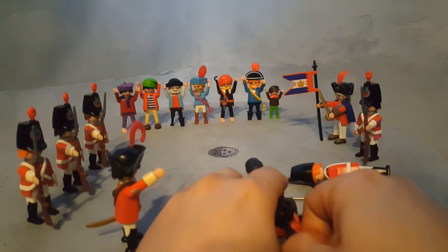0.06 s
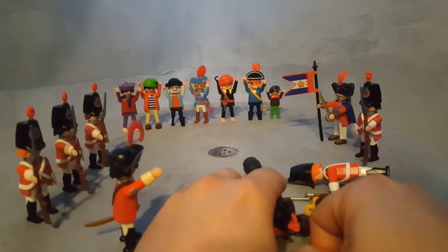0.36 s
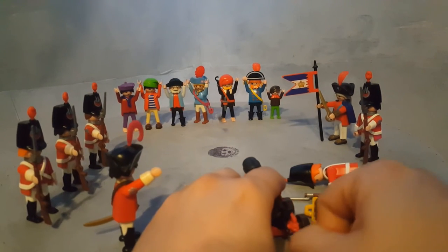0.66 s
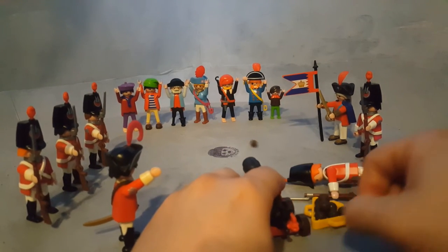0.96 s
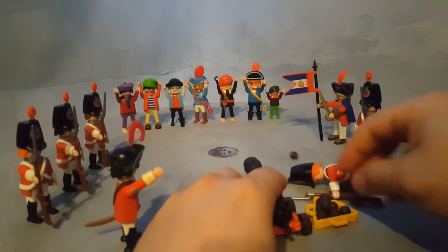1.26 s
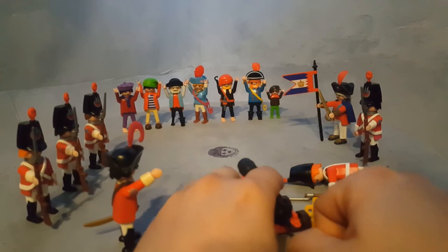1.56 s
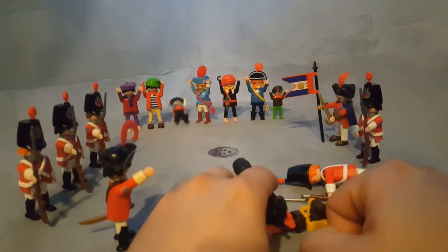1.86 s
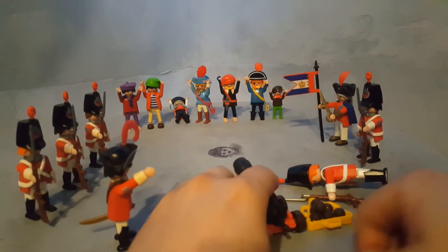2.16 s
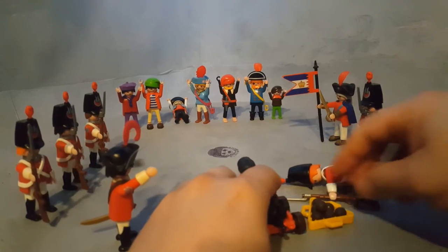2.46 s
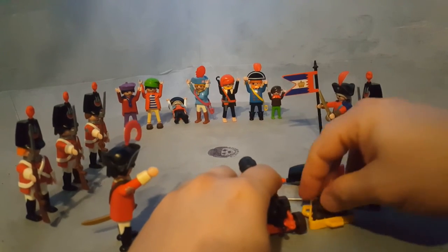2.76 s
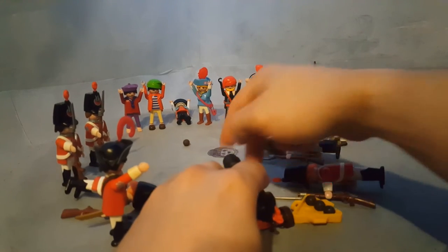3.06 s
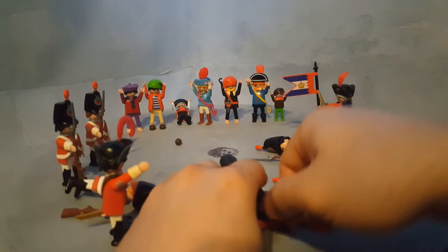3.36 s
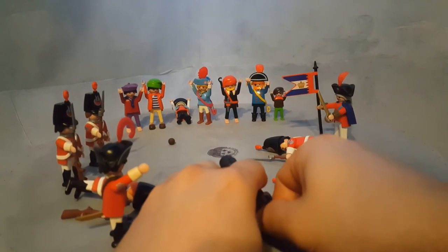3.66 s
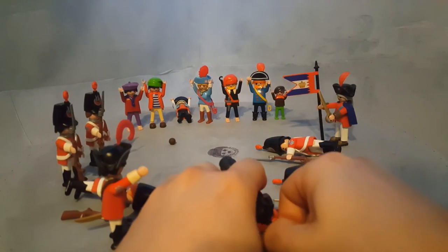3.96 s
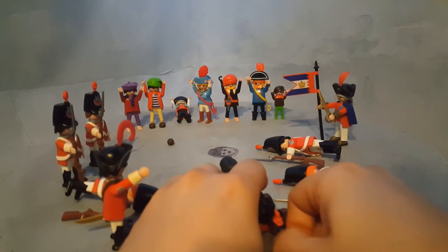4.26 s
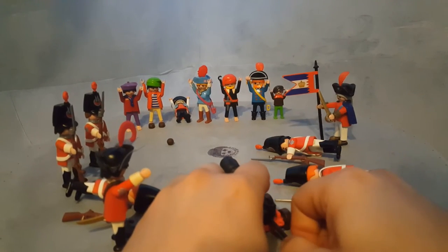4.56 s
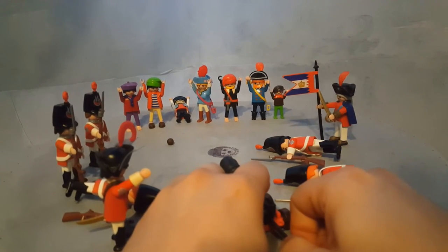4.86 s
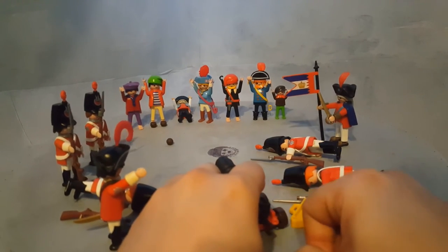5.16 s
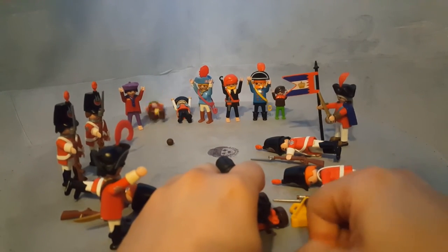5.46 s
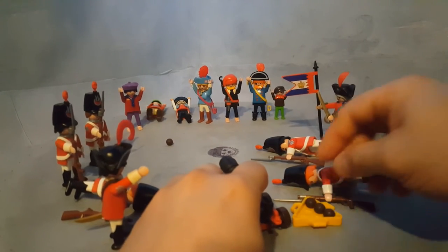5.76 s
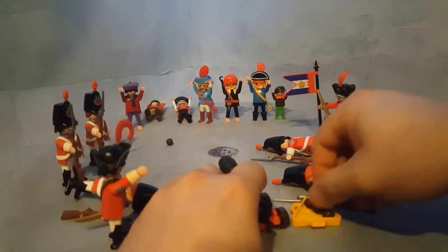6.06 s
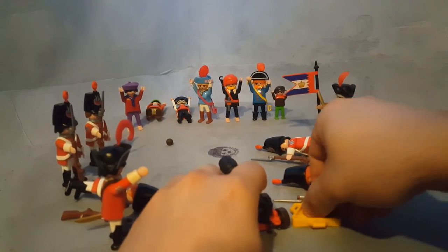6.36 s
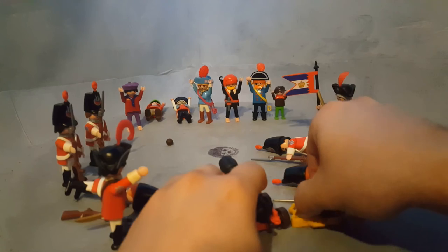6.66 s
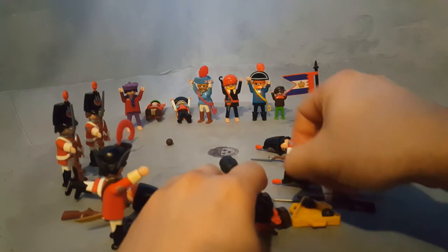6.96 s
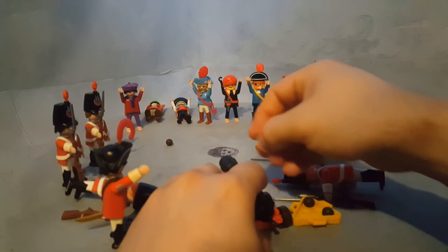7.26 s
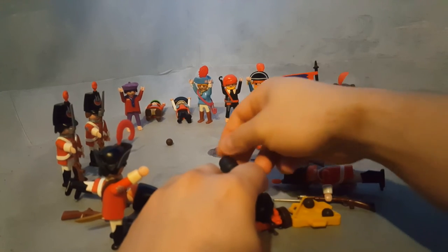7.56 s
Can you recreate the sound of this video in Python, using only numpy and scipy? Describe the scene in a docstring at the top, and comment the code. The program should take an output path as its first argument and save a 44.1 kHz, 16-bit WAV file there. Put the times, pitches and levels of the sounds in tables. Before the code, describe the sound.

A toy spring cannon snaps three times; a small ball bounces and rolls on a wooden table, and plastic soldiers topple.

```python
"""A toy spring cannon fires three times across a wooden table in a small room. The spring snaps and
kicks the table; a little ball knocks, bounces and rolls; plastic soldiers topple. Blows on the table
are short pulses that ring its modes; plastic cracks are fast-decaying noise. Fingers nudge, click and
drag the pieces, and a loose part pings. A fine hiss swells after each shot and fades, with some finger
rubbing. Quiet room noise lies below. Six times the level dips briefly."""
import sys
import numpy as np
from scipy import signal
from scipy.fft import rfft, irfft
from scipy.io import wavfile
from scipy.ndimage import uniform_filter1d

SR = 44100
rng = np.random.default_rng(int(sys.argv[2]) if len(sys.argv) > 2 else 0)


def transcribe(signal):
    """Save signal, clipped to [-1, 1], as a 16-bit WAV file at the path in sys.argv[1]."""
    frames = np.atleast_2d(signal).T
    limited = np.clip(frames, -1, 1)
    pcm = np.round(limited * 32767).astype(np.int16)
    wavfile.write(sys.argv[1], SR, pcm)


N = 339570
IMPULSE_N = 12288
TIME_S, AGE_S = np.arange(N) / SR, np.arange(IMPULSE_N) / SR
BIN_HZ = np.maximum(np.arange(IMPULSE_N // 2 + 1) * SR / IMPULSE_N, 1)

# spectra: freq_hz, gain_db
AIR_COLOUR = [(12, -37), (28, -18.5), (60, -10.5), (120, -4.5), (200, -12.5), (330, -18.5), (560, -24),
              (1000, -32), (1600, -31), (2500, -34), (4000, -39.5), (8000, -50), (16000, -51)]
HISS_COLOUR = [(100, 3.5), (400, 6), (800, 16.5), (1500, 9.5), (2500, 2.5), (4500, 1), (6500, -3),
               (8600, 1), (10500, -4.5), (16000, 0.5)]
KNOCK_COLOUR = [(50, -28.5), (110, -18.5), (200, -21.5), (300, -13.5), (400, -8.5), (500, -7), (700, -1),
                (1200, -3), (1550, -5), (1900, -15.5), (2400, -23), (4000, -34), (8000, -44), (16000, -54)]
CLICK_COLOUR = [(200, -16.5), (600, -5), (1400, -3), (2600, -7), (3400, -3.5), (4000, -4.5), (4600, -3.5),
                (5600, -3.5), (7000, -2.5), (8700, 0.5), (10200, -7.5), (13000, -5.5), (16000, -13)]
ROLL_COLOUR = [(100, -22), (400, -21), (650, -5), (850, 1), (1150, 1.5), (1400, -5), (1750, -28),
               (2500, -21.5), (5000, -44.5), (16000, -53.5)]
NUDGE_COLOUR = [(100, -16), (300, -12.5), (450, -5.5), (850, 1.5), (1400, -6.5), (2200, -14), (3500, -22),
                (8000, -32), (16000, -40.5)]
DRAG_COLOUR = [(60, -14), (150, -6), (320, 2), (700, -1.5), (1400, -2.5), (2100, -11.5), (3200, -23.5),
               (6000, -32), (16000, -56)]
# modes of the table top and of a small loose part: freq_hz, level_db, t60_s
TABLE_MODES = [(334, -9, 0.31), (404.2, -1.5, 0.067), (457.2, -2.5, 0.21), (525.6, -1, 0.19),
               (612, -3.5, .12), (681.7, -6, .14), (735, -0.5, 0.095), (840.3, -7.5, 0.18),
               (916.4, -7.5, 0.16), (1035, -1.5, 0.11), (1120, -5, .12), (1182, -3, 0.058),
               (1361, 3.5, 0.058), (1373, -2, 0.077), (1430, -1.5, 0.15), (1488, -6, 0.11), (1710, -7, .13),
               (1840, -1.5, 0.086)]
PING_MODES = [(2040, -4, .1), (2466, -9, .1), (3375, -7, .07), (3887, -2, .08), (5523, 0, .1),
              (5750, -3, .06), (6955, -10, .06)]
# room decay: freq_hz, t60_s
ROOM_DECAY = [(150, 0.65), (600, 0.095), (1400, .22), (3700, 0.14), (9000, 0.12), (16000, 0.093)]
# wavering room tones: centre_hz, width_hz, level_db
HUMS = [(124, 57, -68.5), (1130, 130, -85.5), (2230, 220, -81.5)]
# fine hiss, swelling after each shot and fading: time_s, treble_db
HISS_LEVELS = [(0.0, -80), (0.28, -80), (0.45, -64), (0.86, -66), (1.39, -79), (1.63, -79), (1.78, -62),
               (2.08, -63), (2.9, -74), (3.43, -76), (3.82, -70), (4.14, -75), (4.27, -82), (5.1, -80),
               (5.23, -67), (5.68, -66), (6.43, -70), (6.67, -75), (7.51, -81), (7.7, -85)]
# firmer stroke while loading: start_s, end_s, first_db, last_db
LOADING_STROKE = (3.81, 3.86, -65, -67)
# cannon shots: start_s, level_db, table_hz, spring_hz, plunger_s, plunger_db, plunger_hz
SHOTS = [(0.2608, -22, 990, 6800, 0.3488, -31, 9100), (1.5915, -23, 1310, 4970, 1.6663, -38, 3300),
         (5.0692, -21.5, 730, 4760, 5.1496, -27.5, 8470)]
# knocks on the table, one followed by a quick echo:
# start_s, level_db, pitch_hz, thud_db, bite_db, tick_db, ring_db
KNOCKS = [(0.3754, -14.5, 940, 2.5, 7.5, 4, -.5), (1.4262, -45.5, 1336, 3.5, 8.5, 24, -6),
          (1.6674, -41.5, 460, 9, 5.5, 4.5, 8), (2.051, -24, 1220, 0, 1.5, 0, -7.5),
          (2.064, -28.5, 1160, -6, -8, -9, 5), (2.8076, -36.5, 960, -17, -3, -7, -22),
          (4.3104, -46.5, 1400, -3, 13, 13.5, -7.5), (5.2142, -19, 790, -8, 5.5, 5, -3.5),
          (5.349, -35.5, 690, -7.5, -5, 5, -5.5), (5.56, -31.5, 880, 13, 1, -2, -3),
          (5.598, -31, 750, -12, -6, 3, -5), (5.9953, -34, 700, 24, 12, 16, -3),
          (6.035, -36.5, 810, 14, 3, 8, -12), (6.1023, -38.5, 696, 20, 6, -5, -17),
          (6.1154, -37.5, 870, 9, 5, 11, -17), (6.367, -40, 1170, 6, 7, 13, -18),
          (6.6689, -42.5, 876, -16.5, -30, -4, -3)]
# ball bouncing to rest: start_s, end_s, flight_s, shortest_s, kept_ratio, level_db, loss_db,
# pitch_hz, thud_db, bite_db, bite_step_db, tick_db
BOUNCES = [(0.6018, 1.0, .1455, .0068, .656, -14, 5.1, 1200, -1, 7.5, -3.4, 2),
           (2.188, 2.6, .0903, .0297, .512, -19.5, 2.8, 820, -7.5, -9, 1.4, -3),
           (5.6165, 5.785, .0632, .0035, .67, -20.5, 3.9, 760, -16, -7, -.5, -3.5)]
# ball rolling: start_s, end_s, first_db, last_db, spread_db, ring_db
ROLLS = [(.97, 1.3, -49, -47.5, 2.5, 2.5), (2.65, 2.8, -44.5, -43.5, 4.5, -8), (5.6, 5.92, -46, -54, 3, 1)]
# level dips: centre_s
DIPS = [1.354, 2.851, 4.249, 4.382, 6.716, 7.65]
# a soldier rocking just before it falls, then fingers nudging the cannon and ball tray; one list per spell:
# time_s, level_db
NUDGE_SPELLS = [
    [(1.7, -61), (1.76, -53), (1.88, -52)],
    [(2.87, -60), (3.016, -64), (3.392, -68), (3.82, -60), (4.112, -66), (4.23, -72)],
    [(6.4, -59), (6.728, -67), (6.848, -68), (7.47, -71), (7.616, -75), (7.7, -75)],
]
# ball hitting a soldier: start_s, level_db, pitch_hz, thud_db
TOPPLES = [(1.8958, -17.5, 610, 10.5), (5.4951, -16.5, 1400, 6)]
# cracks of each falling soldier: delay_s, relative_db, pitch_hz, top_db, body_db
FALL_CRACKS = [(.002, -21, 2830, -9, 9), (.0115, -14, 8000, 1, 8.5), (.062, -26, 8600, -4, 0)]
# loose part set ringing: start_s, level_db
PINGS = [(1.956, -54), (2.9469, -45), (6.861, -61)]
# pieces clicking in the hand: start_s, level_db, pitch_hz, top_db, body_db
HAND_CLICKS = [(2.6271, -54.5, 8800, 3, 13), (2.7847, -54, 8720, -1, 9), (2.9201, -50, 3420, -19, 9),
               (2.9471, -42, 5440, -15, 2), (3.095, -55.5, 3250, 0, 13), (3.2445, -59, 3500, 0, 10),
               (3.7152, -53, 8680, 1, 9), (4.3091, -42.5, 3640, -1, 4.5), (5.2279, -39, 8700, 2, 12),
               (5.3806, -41, 3270, 0, 12), (5.9956, -46.5, 3330, -4, 12), (6.4163, -52.5, 3420, 2, 16),
               (6.5581, -56, 3620, 3, 12), (6.861, -47, 2910, -14.5, -1.5), (7.39, -62, 3400, 0, 12)]
# piece dragged over the table: start_s, end_s, first_db, last_db
DRAG = (6.0, 6.36, -44, -44.5)
# one decaying complex wave per table mode
MODE_WAVES = np.array([np.exp(2j * np.pi * hz * AGE_S) * 10 ** (-3 * AGE_S / t60_s)
                       for hz, _, t60_s in TABLE_MODES])


def from_db(db):
    return 10 ** (np.asarray(db) / 20)


def rms(x):
    return np.sqrt(np.mean(x ** 2) + 1e-20)


def onset_rms(x, span_ms):
    return rms(x.mean(0)[:span_ms * SR // 1000])


def unit_energy(x):
    return x / (rms(x) * np.sqrt(IMPULSE_N))


def evened(x, window_s):
    """Holds the running rms near 1."""
    power = np.maximum(uniform_filter1d(x.mean(0) ** 2, int(window_s * SR)), 0)
    return x / np.sqrt(power + .01 * rms(x) ** 2)


def fade(t60_s):
    return from_db(-60 * AGE_S / t60_s)


def envelope(rows):
    """Gain from rows of time_s, level_db; silent outside them."""
    return from_db(np.interp(TIME_S, *np.transpose(rows), left=-200, right=-200))


def swell(start_s, end_s, first_db, last_db, rise_db_per_s, fall_db_per_s):
    """Gain of one movement: rise, glide, fall."""
    held_db = np.interp(TIME_S, [start_s, end_s], [first_db, last_db])
    before_db = rise_db_per_s * np.maximum(start_s - TIME_S, 0)
    after_db = fall_db_per_s * np.maximum(TIME_S - end_s, 0)
    return from_db(held_db - np.minimum(before_db + after_db, 150))


def at_hz(points, hz=BIN_HZ):
    """Interpolates on a log frequency axis."""
    points_hz, values = np.transpose(points)
    return np.interp(np.log(hz), np.log(points_hz), values)


def high_shelf(edge_hz):
    return 1 / (1 + (edge_hz / BIN_HZ) ** 6)


def bump(centre_hz, width_oct):
    return np.exp(-.5 * (np.log2(BIN_HZ / centre_hz) / width_oct) ** 2)


def band(x, low_hz, high_hz):
    return signal.sosfilt(signal.butter(2, [low_hz, high_hz], "band", fs=SR, output="sos"), x)


def response(colour_db):
    """Minimum-phase impulse response of a spectrum."""
    cepstrum = irfft(np.log(from_db(colour_db)))
    causal = np.r_[1, np.full(IMPULSE_N // 2 - 1, 2), 1, np.zeros(IMPULSE_N // 2 - 1)]
    return irfft(np.exp(rfft(cepstrum * causal)))


def convolve(x, impulse):
    return signal.fftconvolve(np.atleast_2d(x), np.atleast_2d(impulse), axes=1)[:, :np.shape(x)[-1]]


def stereo_noise(samples, correlation):
    mid, side = rng.standard_normal((2, samples))
    return np.sqrt((1 + correlation) / 2) * mid + np.sqrt((1 - correlation) / 2) * side * [[1], [-1]]


def grains(rate_per_s, spread_db):
    """Tiny impulses of uneven strength at random times."""
    sizes = from_db(spread_db * np.minimum(rng.exponential(1, N), 4)) * rng.choice([-1, 1], N)
    return sizes * (rng.random(N) < rate_per_s / SR)


def pan_left(db):
    return from_db(np.array([[db], [-db]]) / 2)


def lag_left(x, samples):
    index = np.arange(N)
    return np.array([np.interp(index - samples, index, x[0]), x[1]])


def add(out, start_s, sound):
    start = round(start_s * SR)
    out[:, start:start + IMPULSE_N] += sound[:, :N - start]


def play(source, rows):
    out = np.zeros((2, N))
    for start_s, *settings in rows:
        add(out, start_s, source(*settings))
    return out


def room_noise(air_db=-62, crossover_hz=900):
    """Quiet air, alike in both ears in the bass; narrow noise bands waver as hums."""
    low, high = stereo_noise(N, correlation=.93), stereo_noise(N, correlation=.26)
    lowpass = signal.butter(1, crossover_hz, fs=SR, output="sos")
    air = convolve(signal.sosfilt(lowpass, low - high) + high, response(at_hz(AIR_COLOUR)))
    out = from_db(air_db) * air / rms(air.mean(0))
    for centre_hz, width_hz, level_db in HUMS:
        hum = band(rng.standard_normal(N), centre_hz - width_hz / 2, centre_hz + width_hz / 2)
        out += from_db(level_db) * hum / rms(hum)
    return out


def fine_hiss(smooth_db=-5):
    """Grainy treble hiss that swells after each shot and fades, with some finger rubbing."""
    specks = grains(rate_per_s=150, spread_db=4.5)
    grit = convolve(specks, stereo_noise(IMPULSE_N, correlation=.2) * fade(t60_s=.012))
    texture = grit / rms(grit) + from_db(smooth_db) * stereo_noise(N, correlation=.35)
    hiss = convolve(texture, response(at_hz(HISS_COLOUR)))
    gain = envelope(HISS_LEVELS) + swell(*LOADING_STROKE, rise_db_per_s=130, fall_db_per_s=90)
    return gain * hiss / rms(band(hiss.mean(0), 4000, 11000))


def cannon(snap_db=-3, snap_delay_s=.001):
    """The spring snaps and kicks the table; the plunger clicks back."""
    wood, plastic = np.zeros((2, 2, N))
    for start_s, level_db, table_hz, spring_hz, plunger_s, plunger_db, plunger_hz in SHOTS:
        add(wood, start_s, knock(level_db, table_hz, thud_db=-4, bite_db=-1, tick_db=7, ring_db=-3))
        add(plastic, start_s + snap_delay_s, click(level_db + snap_db, spring_hz, top_db=-2, body_db=-1.5))
        add(plastic, plunger_s, click(plunger_db, plunger_hz, top_db=3, body_db=.7))
    return wood, plastic


def table_ring(modes_db=-25, flex_t60_s=.04, spread_db=2, build_s=.0027):
    """Bending waves return from the edges and settle into modes; strengths vary with the spot struck."""
    mode_db = np.array(TABLE_MODES)[:, 1]
    count = len(mode_db)
    strength = from_db(mode_db + spread_db * rng.standard_normal(count))
    phase_rad = rng.uniform(0, 2 * np.pi, count) + .45 * rng.standard_normal((2, count))
    modes = ((strength * np.exp(1j * phase_rad)) @ MODE_WAVES).real
    flex = stereo_noise(IMPULSE_N, correlation=.75) * fade(flex_t60_s)
    build_up = 1 - np.exp(-(AGE_S / build_s) ** 2)
    return (from_db(modes_db) * modes + flex) * build_up


def struck_table(colour_db, ring_db, travel_s=.00039, grit_db=-10, grit_t60_s=.014):
    """A soft push with treble grit crosses the top as a pulse and sets it ringing."""
    push = response(-20 * np.log10(1 + (BIN_HZ / 4500) ** 2))
    grit = from_db(grit_db) * band(rng.standard_normal(IMPULSE_N), 2800, 15000) * fade(grit_t60_s)
    # bending waves: 1 kHz arrives after travel_s, higher pitches sooner
    dispersion = np.exp(-4j * np.pi * travel_s * np.sqrt(1000 * BIN_HZ))
    pulse = irfft(rfft(push + grit) * rfft(response(colour_db)) * dispersion)
    return unit_energy(pulse) + from_db(ring_db) * unit_energy(convolve(table_ring(), pulse))


def knock(level_db, pitch_hz, thud_db, bite_db, tick_db, ring_db, focus_db=6, echo_s=.0105, echo_db=-14.5):
    """A knock on the table. Heavy pieces add thud; hard contacts add bite and tick."""
    colour_db = at_hz(KNOCK_COLOUR) + focus_db * bump(pitch_hz, width_oct=.24)
    colour_db += thud_db * (1 - high_shelf(520))
    colour_db += bite_db * bump(1900, width_oct=.33) + tick_db * high_shelf(2800)
    # the struck spot sings briefly, louder where the top is stiff and high-pitched
    spot = unit_energy(np.sin(2 * np.pi * pitch_hz * AGE_S) * fade(t60_s=.028) * (1 - fade(t60_s=.011)))
    spot_db = -8.5 + 12 * np.log2(pitch_hz / 1000)
    sound = struck_table(colour_db, ring_db) + from_db(spot_db) * spot
    wall_echo = np.interp(AGE_S - echo_s, AGE_S, sound.mean(0), left=0)
    sound += from_db(echo_db) * wall_echo
    return sound * from_db(level_db) / onset_rms(sound, span_ms=4)


def click(level_db, pitch_hz, top_db, body_db, focus_db=6.5, crack_t60_s=.017, shell_db=-26, shell_t60_s=.33):
    """A hollow plastic shell cracks, then rings faintly."""
    colour_db = at_hz(CLICK_COLOUR) + focus_db * bump(pitch_hz, width_oct=.1)
    colour_db += top_db * high_shelf(6700) + body_db * (1 - high_shelf(2700))
    decay = fade(crack_t60_s) + from_db(shell_db) * fade(shell_t60_s)
    crack = convolve(stereo_noise(IMPULSE_N, correlation=.47) * decay, response(colour_db))
    return crack * from_db(level_db) / onset_rms(crack, span_ms=10)


def reflections(x, onset_s=.008):
    """Near walls answer; each octave decays at its own rate."""
    edges_hz = np.geomspace(80, 18000, 9)
    tail = np.zeros((2, IMPULSE_N))
    for low_hz, high_hz in zip(edges_hz, edges_hz[1:]):
        t60_s = at_hz(ROOM_DECAY, np.sqrt(low_hz * high_hz))
        tail += band(stereo_noise(IMPULSE_N, correlation=.1), low_hz, high_hz) * fade(t60_s)
    onset = np.clip(2 * AGE_S / onset_s - 1, 0, 1)
    return convolve(x.mean(0), unit_energy(tail * onset))


def bouncing(tick_step_db=.9, ring_db=-5.8, wander_oct=.15):
    """Flights shorten; each touch lands on a new spot, weaker and with more tick."""
    out = np.zeros((2, N))
    for (touch_s, end_s, flight_s, shortest_s, kept_ratio, level_db, loss_db,
         pitch_hz, thud_db, bite_db, bite_step_db, tick_db) in BOUNCES:
        while touch_s < end_s:
            spot_hz = pitch_hz * 2 ** (wander_oct * rng.standard_normal())
            add(out, touch_s, knock(level_db, spot_hz, thud_db, bite_db, tick_db, ring_db))
            touch_s += flight_s
            flight_s = max(shortest_s + kept_ratio * (flight_s - shortest_s), .01)
            level_db -= loss_db
            bite_db += bite_step_db
            tick_db += tick_step_db
    return out


def rolling(hops_per_s=92, jitter=.28):
    """A ball, not quite round, hops along in a quick, nearly regular patter."""
    out = np.zeros((2, N))
    for *glide, spread_db, ring_db in ROLLS:
        gaps, sizes = rng.standard_normal((2, 2000))
        landings = (np.cumsum(np.exp(jitter * gaps)) / hops_per_s * SR).astype(int)
        inside = landings < N
        hops = np.bincount(landings[inside], from_db(spread_db * sizes)[inside], N)
        patter = convolve(hops, struck_table(at_hz(ROLL_COLOUR), ring_db))
        out += evened(patter, window_s=.06) * swell(*glide, rise_db_per_s=110, fall_db_per_s=230)
    return out


def nudging(ring_db=-1.5):
    """A soldier rocking before its fall, and toys shifted by the fingers, give small, scattered taps on the
    table."""
    taps = convolve(grains(rate_per_s=70, spread_db=6.5), struck_table(at_hz(NUDGE_COLOUR), ring_db))
    return evened(taps, window_s=.12) * sum(envelope(spell) for spell in NUDGE_SPELLS)


def toppling(touches=3, gap_s=.0145, drop_db=7.5, loss_db=3, first_hz=540, pitch_ratio=1.35):
    """The ball strikes; the soldier cracks and rattles down in quick, weakening touches."""
    wood, plastic = np.zeros((2, 2, N))
    for start_s, level_db, pitch_hz, thud_db in TOPPLES:
        add(wood, start_s, knock(level_db, pitch_hz, thud_db, bite_db=-9.5, tick_db=1.2, ring_db=1.5))
        for k in range(touches):
            touch_db, touch_hz = level_db - drop_db - k * loss_db, first_hz * pitch_ratio ** k
            touch = knock(touch_db, touch_hz, thud_db=8, bite_db=-8, tick_db=4, ring_db=-1)
            add(wood, start_s + (k + 1) * gap_s, touch)
        for delay_s, relative_db, *timbre in FALL_CRACKS:
            add(plastic, start_s + delay_s, click(level_db + relative_db, *timbre))
    return wood, plastic


def ping(level_db):
    """A stiff little part rings in a few clear modes."""
    ring = sum(from_db(db) * np.sin(2 * np.pi * hz * AGE_S) * fade(t60_s) for hz, db, t60_s in PING_MODES)
    return from_db(level_db) * ring[None]


def dragging(ring_db=-8.5):
    """A piece pressed on the table sticks and slips; the hand damps the ringing."""
    slips = convolve(grains(rate_per_s=270, spread_db=2.7), struck_table(at_hz(DRAG_COLOUR), ring_db))
    return evened(slips, window_s=.063) * swell(*DRAG, rise_db_per_s=1500, fall_db_per_s=130)


def scene():
    """Table and toys close by, louder on the left; the room all round."""
    kicks, snaps = cannon()
    falls, cracks = toppling()
    wood = kicks + falls + bouncing() + play(knock, KNOCKS) + rolling() + dragging() + nudging()
    bright = snaps + cracks + play(click, HAND_CLICKS) + play(ping, PINGS) + fine_hiss()
    direct = lag_left(wood, samples=4.5) * pan_left(db=5.5)
    direct += lag_left(bright, samples=1) * pan_left(db=1.9)
    walls = from_db(-11.5) * reflections(wood) + from_db(-7) * reflections(bright)
    return direct + walls * pan_left(db=2.5) + room_noise() * pan_left(db=3)


def record(dry):
    """The level dips briefly six times; the top treble is cut."""
    depth_db, sigma_s, cutoff_hz = 27, .011, 16000
    dip_db = depth_db * sum(np.exp(-.5 * ((TIME_S - centre_s) / sigma_s) ** 2) for centre_s in DIPS)
    lowpass = signal.ellip(10, .2, 80, cutoff_hz, fs=SR, output="sos")
    return signal.sosfilt(lowpass, dry * from_db(-dip_db))


dry = scene()
out = record(dry)
transcribe(out)
```